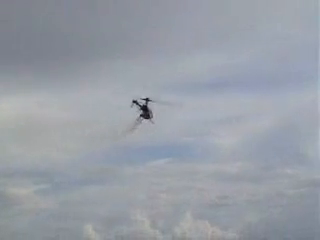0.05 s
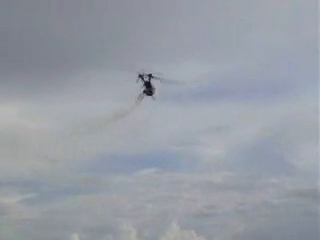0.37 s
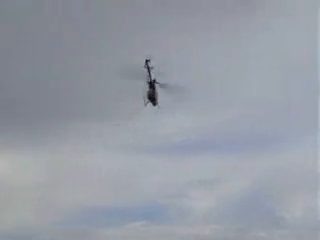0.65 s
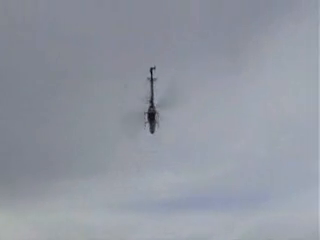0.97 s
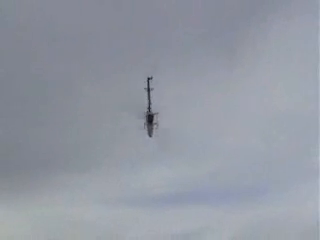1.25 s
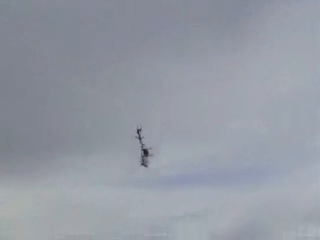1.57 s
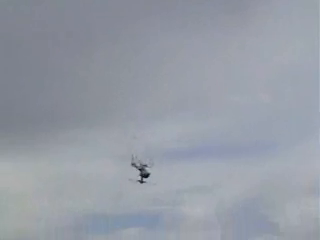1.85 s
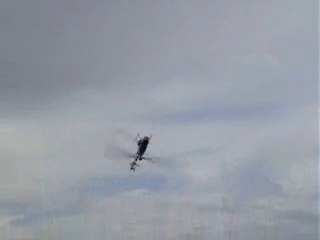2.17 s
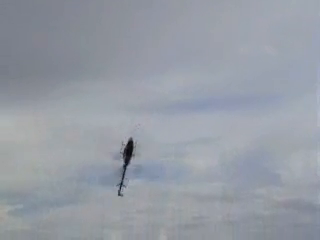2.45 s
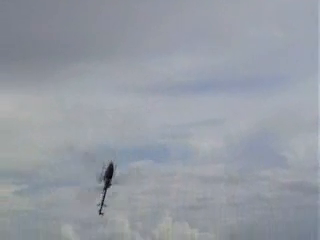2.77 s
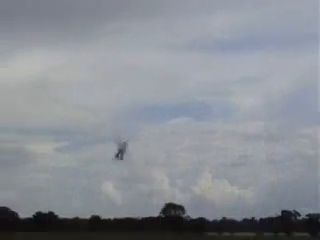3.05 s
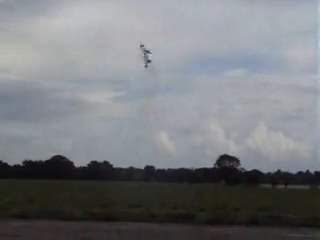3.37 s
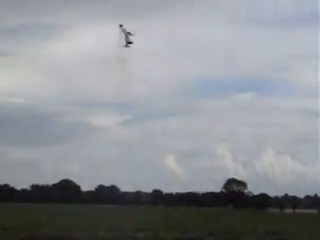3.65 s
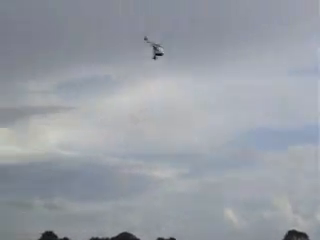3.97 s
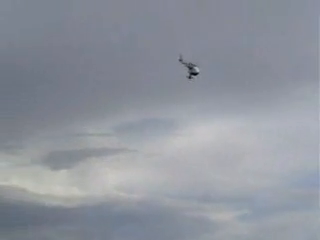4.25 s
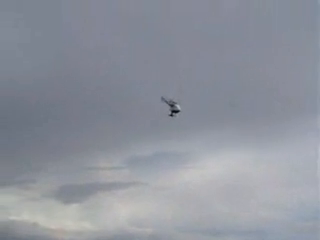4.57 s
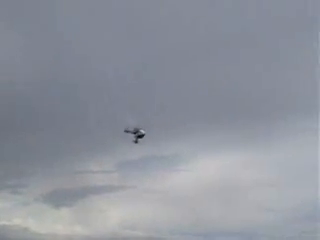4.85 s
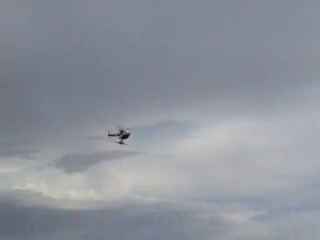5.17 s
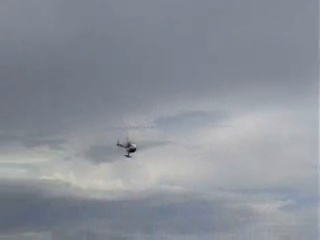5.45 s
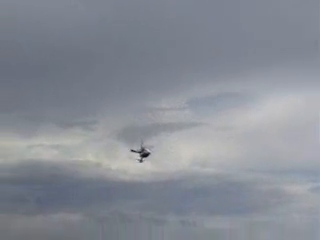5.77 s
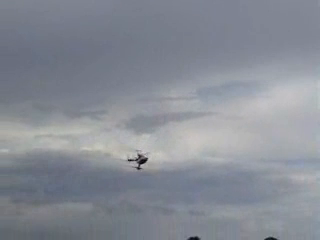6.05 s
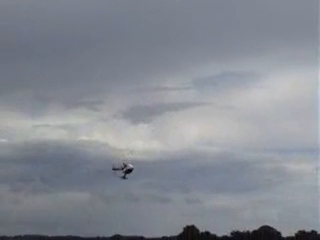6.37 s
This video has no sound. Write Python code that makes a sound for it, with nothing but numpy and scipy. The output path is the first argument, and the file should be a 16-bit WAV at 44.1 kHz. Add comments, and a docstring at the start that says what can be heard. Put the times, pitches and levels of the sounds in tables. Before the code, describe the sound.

The high, raspy buzz of a fuel-powered model helicopter sags and recovers through flips, rotors swishing, before wind buffets the microphone.

```python
"""Model helicopter over a field

A nitro model helicopter flips and swoops. Its two-stroke engine, geared to both rotors, sags under
load and skips every other firing when running light. Gears whine and the blades chop the air.
An echo off the ground sweeps through it all, and gusts on the microphone make the volume duck."""
import sys
import numpy as np
from scipy import signal
from scipy.fft import rfft, irfft, next_fast_len
from scipy.io import wavfile
from scipy.ndimage import uniform_filter1d

SR = 44100
rng = np.random.default_rng(int(sys.argv[2]) if len(sys.argv) > 2 else 0)


def unload_audio(sound):
    """Save the sound as a 16-bit wav file, at the path given as the first command line argument."""
    columns = np.transpose(np.atleast_2d(sound))
    # keep every value between -1 and 1, then stretch to whole-number steps
    steps = np.round(np.clip(columns, -1, 1) * 32767)
    wavfile.write(sys.argv[1], SR, steps.astype(np.int16))


N = 283122
TIME = np.arange(N) / SR
GEAR_RATIO = 8.5  # engine turns for one turn of the main rotor

# how fast the engine spins: (time [s], speed [turns per s])
ENGINE_SPEED = [(0, 279.4), (.6, 277.8), (1.05, 270.9), (1.49, 263), (1.87, 262.9), (2.09, 260.5),
                (2.54, 253.4), (2.84, 251.2), (3.02, 255.7), (3.43, 245.7), (3.6, 248.6), (3.88, 259.2),
                (4.18, 267.6), (4.48, 274.4), (4.9, 280), (5.33, 281), (5.9, 289.2), (6.42, 294.1)]
def shaft_angles():
    """How far the engine's crank and the main rotor have turned, in radians."""
    speed, = in_time(ENGINE_SPEED)
    crank = 2 * np.pi * np.cumsum(speed) / SR
    return crank, crank / GEAR_RATIO


# how loud the engine is and how hard it works: (time [s], exhaust level [dB], load [0-1])
ENGINE_EFFORT = [(0, -23, 0.15), (.8, -21.5, 0.2), (1, -21.5, .3), (1.25, -32.5, 0.75), (1.5, -35, 1),
                 (1.72, -28, .6), (1.9, -32, 0.3), (2.15, -26, 0.75), (2.4, -31.5, .9), (2.72, -29, 0.6),
                 (2.88, -23, 0.5), (3.36, -34.5, 1), (3.75, -28.5, 1), (4.17, -29.5, 0.29),
                 (4.75, -29.5, 0.33), (5.52, -30, .27), (5.74, -25, 0.1), (6, -29.5, 0.13)]
# the muffler's tones: (pitch [x engine speed], level running light [dB], level under load [dB])
EXHAUST_TONES = [(1, -12.5, -19), (2, -15, -10), (3, -15, -8), (4, -14, 0.5), (5, 1, -22), (6, -0.5, -1),
                 (7, -9.5, 0), (8, -15.5, -4), (9, -15, -15)]
# the pulses' sharp edge: (pitch [x engine speed], level running light [dB], level under load [dB])
RASP_TONES = [(9.29, -6, -7.5), (10, 1, 2.5), (11.05, -8, -9.5), (12, -0.5, -3.5), (12.8, -20, -4.5),
              (13.7, 1.5, -5), (15.95, -4.5, -1.5), (17.2, -13, -3.5), (17.3, -17, -5), (17.7, -15, -8),
              (28.22, -13.5, -14)]
def exhaust(crank, rotor, wobble=0.1, wobble_light=0.051, jitter=0.021):
    """Exhaust pulses buzz and rasp; each tone wavers once a rotor turn, which roughens it."""
    level_db, load = in_time(ENGINE_EFFORT)
    treble_db, = in_time(TREBLE_SWING)
    load = np.clip(load, 0, 1)
    angle = crank + (wobble + wobble_light * (1 - load)) * np.sin(rotor) + jitter * drift(40)
    # the lowest tones spread all round, so they swell less as the muffler turns
    low_db = 0.74 * (level_db.mean() - level_db)
    tones = firing_tones(angle, EXHAUST_TONES, load, flutter_db=1.16, low_db=low_db)
    buzz = np.sqrt(2) * from_db(level_db) * tones
    rasp_db = hiss_level() - 4.5 * (1 - load) + 0.15 * treble_db  # sharper under load
    rasp = from_db(rasp_db) * rms_one(firing_tones(angle, RASP_TONES, load, flutter_db=4.0))
    return (buzz + rasp) * (1 + 0.024 * np.cos(2 * rotor))


def firing_tones(angle, table, load, flutter_db, low_db=0):
    """Firings make tones at whole multiples of engine speed; skipped ones add tones halfway between."""
    multiples, light, loaded = np.transpose(table)
    skip_db = skipped_firings()
    out = np.zeros(N)
    for half in range(round(2 * multiples[0]), round(2 * multiples[-1])):
        k, halfway = half / 2, half % 2
        if halfway and k > 15:
            continue
        db = np.interp(k, multiples, light) * (1 - load) + np.interp(k, multiples, loaded) * load
        db = db + low_db * (k < 4) + skip_db * halfway
        out += from_db(db + flutter_db * drift(3.6)) * np.cos(k * angle + rng.uniform(0, 2 * np.pi))
    return out


# spells of skipping every other firing: (start [s], end [s], halfway tones against whole ones [dB])
SKIP_SPELLS = [(0, 0.497, -3), (1.897, 1.984, -1.5), (2.577, 2.665, 2.5), (4.126, 5.353, -4.5),
               (5.537, 6.05, -14.5)]
def skipped_firings(fade_db_per_s=76, steady_firing_db=-22.5):
    """Strength of the halfway tones in dB: each spell of skipping fades in and out."""
    spells = [db - fade_db_per_s * np.abs(TIME - np.clip(TIME, start, end))
              for start, end, db in SKIP_SPELLS]
    return np.maximum(np.max(spells, axis=0), steady_firing_db)


# the high sounds swing up and down as the helicopter turns: (time [s], level [dB])
TREBLE_SWING = [(0, -0.5), (1.25, 0.5), (1.42, 4), (1.85, -4), (2.03, 2.5), (2.25, -4.5), (2.5, -2),
                (2.73, 0.5), (2.88, -7.5), (3.03, -2.5), (3.18, 4), (3.33, -8), (3.5, -5.5), (3.72, 0),
                (4.38, 1), (4.6, -2.5), (4.9, -0.5), (6.42, -8.5)]
def hiss_level():
    """Base level of rasp and hiss in dB: both rise with the treble and with the exhaust."""
    exhaust_db = in_time(ENGINE_EFFORT)[0]
    return -27.5 + 0.5 * in_time(TREBLE_SWING)[0] + 0.34 * (exhaust_db - exhaust_db.mean())


# tone colour of the exhaust's hiss: (frequency [Hz], level [dB])
HISS_COLOUR = [(700, -17), (1300, 2.5), (1800, 5), (2250, -9), (2700, 4), (3300, -2), (4000, 3.5),
               (4700, -2.5), (5600, 3.5), (6600, -9), (8000, -26)]
# tone colour of its highest sizzle: (frequency [Hz], level [dB])
SIZZLE_COLOUR = [(4000, -33), (5600, 7.5), (6300, 7), (7200, 5), (7900, -8)]
def exhaust_hiss(crank, rotor, hiss_db=-1.0, sizzle_db=-32):
    """The jet of exhaust gas hisses in puffs, one per engine turn, and pulses faintly with the rotor."""
    hiss = from_db(hiss_level() + hiss_db) * noise(HISS_COLOUR)
    sizzle = from_db(in_time(TREBLE_SWING)[0] + sizzle_db) * noise(SIZZLE_COLOUR)
    pulsing = puffs(crank, depth=0.3) * puffs(rotor, depth=0.053) * puffs(2 * rotor, depth=0.017)
    return (hiss + sizzle) * pulsing


# the main rotor bites hardest in the two flips: (time [s], thrum level [dB], swish level [dB])
ROTOR_BITE = [(0, -46, -34.5), (.75, -40.5, -33.5), (1.1, -31.5, -28), (1.38, -30, -25.5), (1.7, -34, -26),
              (2.2, -39, -27.5), (2.6, -35.5, -22), (2.84, -31, -21.5), (3.4, -41, -32.5),
              (4.2, -43.5, -33), (5.05, -41, -36), (5.7, -38.5, -33)]
# tone colour of the blades' low thrum: (frequency [Hz], level [dB])
THRUM_COLOUR = [(30, -25), (62, -7), (125, -8.5), (190, -8), (260, -3.5), (390, 0), (480, -6.5), (560, -24),
                (900, -20.5)]
# a deep drone swells as the rotor disc faces the listener: (time [s], level [dB])
DRONE_LEVEL = [(0, -53.5), (.6, -52.5), (1.11, -37), (1.5, -53.5), (6.42, -59.5)]
def blade_thrum(rotor, thrum_db=1.0, odd_db=-4, flutter_db=4.5, stray=0.21):
    """Two main blades beat the air; being slightly unequal, they add odd multiples of the rotor speed."""
    turn_hz = np.mean(np.array(ENGINE_SPEED)[:, 1]) / GEAR_RATIO
    thrum = np.zeros(N)
    for k in range(3, 21):
        db = at_hz(THRUM_COLOUR, k * turn_hz) + odd_db * (k % 2) + flutter_db * drift(8.5)
        thrum += from_db(db) * np.sin(k * rotor + stray * drift(16) + rng.uniform(0, 2 * np.pi))
    drone = from_db(in_time(DRONE_LEVEL)[0]) * rms_one(np.sin(2 * rotor))
    return from_db(in_time(ROTOR_BITE)[0] + thrum_db) * rms_one(thrum) + drone


# tone colour of air torn by the blades: (frequency [Hz], level [dB])
SWISH_COLOUR = [(100, -43), (300, -6.5), (550, -7), (850, 0.5), (1300, -0.5), (1800, -4), (2400, -6.5),
                (4000, -15.5)]
def blade_swish(rotor, swish_db=0.5, chop=0.15, chop_hard=0.55):
    """The blades tear the air; the harder they work, the more the swish gathers into separate chops."""
    level_db = in_time(ROTOR_BITE)[1]
    depth = chop + chop_hard * from_db(level_db - level_db.max())
    chops = np.exp(depth * np.cos(2 * rotor)) / np.sqrt(np.i0(2 * depth))  # same power at any depth
    return from_db(level_db + swish_db) * noise(SWISH_COLOUR) * chops


# a blade hits the swirling air left by the other: (time [s], level [dB])
WAKE_STRIKES = [(2.807, -10.5), (2.871, -20), (2.889, -12), (2.905, -7), (2.922, -14.5), (2.939, -9),
                (2.955, -24), (3.005, -14), (3.021, -11), (3.037, -15), (3.073, -18), (3.107, -18.5)]
def blade_slaps(ring_hz=950, width_hz=300):
    """Each strike is a short knock of air that swells fast and dies away."""
    out = np.zeros(N)
    for start, db in WAKE_STRIKES:
        age = np.maximum(TIME - start, 0)
        rise = np.pi * width_hz * age
        envelope = rise * np.exp(1 - np.minimum(rise, 50))
        out += from_db(db) * envelope * np.sin(2 * np.pi * ring_hz * age)
    return out


def tail_rotor(crank, beats_per_turn=1.2, tail_db=-13, stray=0.21):
    """The tail rotor sings four tones, louder when the main blades work hard."""
    tones = sum(from_db(db) * np.cos(k * beats_per_turn * crank + stray * drift(15))
                for k, db in enumerate([-20.5, -19, -15, 2.0], start=1))
    return from_db(in_time(ROTOR_BITE)[1] + tail_db) * rms_one(tones)


# how the main gear's whine rises and falls: (time [s], level [dB])
WHINE_LEVEL = [(0, -27.5), (.6, -25), (1.33, -22), (1.48, -20.5), (1.72, -23), (1.87, -26.5), (2.35, -29),
               (2.62, -26.5), (3.03, -28.5), (3.27, -15.5), (3.35, -33.5), (3.57, -34), (3.7, -24),
               (3.88, -31), (4.2, -21.5), (4.55, -31.5), (5.7, -29.5), (6.42, -35.5)]
def main_gear(crank, rotor, teeth=20, whine_db=-4.5, flutter_db=3.0):
    """A small gear drives a slightly off-centre big one; unloaded teeth rattle and blur the whine."""
    slack = 1 - np.clip(in_time(ENGINE_EFFORT)[1], 0, 1)
    off_centre = (1.2 + 2.6 * slack) * np.sin(rotor)
    rattle = 0.88 * drift(100) + slack * drift(200)
    tone = np.cos(teeth * crank + off_centre + rattle)
    whine = rms_one(tone * from_db(flutter_db * drift(57)) * puffs(rotor, depth=0.099))
    return from_db(in_time(WHINE_LEVEL)[0] + whine_db) * whine


def tail_gear(crank, rotor, bites_per_turn=16, off_centre=0.51, scatter=0.6):
    """The teeth of the smaller tail drive sing below the main whine, loudest under load."""
    load = in_time(ENGINE_EFFORT)[1]
    level_db = -47.5 + 9 * load + 2 * in_time(TREBLE_SWING)[0]
    angle = bites_per_turn * crank + off_centre * np.sin(rotor) + scatter * drift(72)
    return from_db(level_db) * rms_one(np.cos(angle))


# how late the echo comes, longest with the helicopter overhead: (time [s], delay [ms])
ECHO_DELAY = [(0, 1.6), (.47, 1.606), (1.15, 2.44), (1.42, 2.52), (2.2, 1.76), (3.15, 1.14), (3.44, 1.026),
              (4, 1.63), (4.45, 2.06), (4.97, 2.02), (5.65, 1.436), (6.42, 1.06)]
# the echo weakens while the helicopter rolls over: (time [s], level [dB])
ECHO_LEVEL = [(0, -0.5), (1, -0.5), (1.8, -3.5), (2.1, -3), (2.5, -9), (2.9, -10), (3.4, -1), (6.42, -1.5)]
# what the ground gives back, with the treble scattered away: (frequency [Hz], level [dB])
ECHO_COLOUR = [(100, -1), (900, -5.5), (1500, -2), (2200, -1.5), (3000, -5), (4500, -9.5), (7500, -9.5)]
def with_ground_echo(direct):
    """The sound plus its bounce off the ground; the changing delay sweeps which pitches cancel."""
    delay_ms, = in_time(ECHO_DELAY)
    echo_db, = in_time(ECHO_LEVEL)
    echo = np.interp(TIME - delay_ms / 1000, TIME, coloured(direct, ECHO_COLOUR))
    return direct + from_db(echo_db) * echo


# bands added on the right and taken from the left: (frequency [Hz], width [Hz], level [dB])
RIGHT_LEANING_BANDS = [(1430, 210, -15.5), (2350, 190, -11.5), (5300, 500, -21)]
def stereo_spread(sound):
    """Three narrow bands sit slightly to the right, giving a little stereo width."""
    side = sum(from_db(db) * signal.lfilter(*signal.iirpeak(hz, hz / width, fs=SR), sound)
               for hz, width, db in RIGHT_LEANING_BANDS)
    return np.array([sound - side, sound + side])


# tone colour of soft wind: (frequency [Hz], level [dB])
RUMBLE_COLOUR = [(15, -0.5), (40, -0.5), (80, 2.5), (160, 4), (300, -9.5), (700, -20), (2000, -37.5)]
# tone colour of hard wind: (frequency [Hz], level [dB])
BUFFET_COLOUR = [(40, -32), (110, -7), (220, 2), (350, -1), (700, -3.5), (1200, -12), (3000, -29)]
# gusts on the microphone: (time [s], half-length [s], level [dB], hardness [0-1])
WIND_GUSTS = [(1.268, 0.054, -30, 0.2), (1.552, 0.073, -27, 0.27), (1.72, .04, -35, 0.1),
              (2.31, 0.043, -34.5, 0), (3.276, .045, -33, 0), (4.37, 0.014, -36.5, 0),
              (4.564, 0.015, -33, 0), (4.928, 0.005, -19.5, 0.81), (5, .011, -12.5, 0.78),
              (5.213, 0.14, -32.5, 0.8), (5.438, 0.028, -26.5, 0.93), (5.503, 0.0091, -19.5, 0.87),
              (5.707, 0.051, -28.5, 0.8), (5.815, 0.019, -21.5, 0.9), (5.874, 0.017, -19, 1),
              (6.08, 0.017, -19.5, 0.9), (6.191, 0.03, -24.5, 0.98), (6.246, 0.023, -20, 0.95),
              (6.32, 0.03, -22, 1)]
def wind(breeze_db=-44.5, wander_db=2.5, swell_s=0.031, swell_db=16):
    """A breeze and soft gusts rumble; hard gusts batter the microphone and end in a swell of pressure."""
    rumble = from_db(breeze_db + wander_db * drift(2.6))
    buffet, swell = 0, 0
    for peak_s, half_s, db, hardness in WIND_GUSTS:
        hardness = np.clip(hardness, 0, 1)
        gust = from_db(db) * np.exp(-0.5 * ((TIME - peak_s) / half_s) ** 2)
        rumble += (1 - hardness) * gust
        buffet += hardness * gust
        swell_at = peak_s + half_s + swell_s / 2
        swell += hardness * from_db(db + swell_db) * np.exp(-0.5 * ((TIME - swell_at) / swell_s) ** 2)
    soft = rumble * swirling_air(RUMBLE_COLOUR, shared=0.074) * from_db([[0.7], [-0.7]])  # leans left
    hard = buffet * swirling_air(BUFFET_COLOUR, shared=0.16)
    return soft + hard + swell


def swirling_air(colour, shared, lumps_db=2.6):
    """Lumpy wind noise, partly shared by left and right."""
    common = np.sqrt(shared) * noise(colour)
    separate = np.sqrt(1 - shared) * np.array([noise(colour), noise(colour)])
    return rms_one((common + separate) * from_db(lumps_db * drift(28)))


def from_db(db):
    """Turn decibels into a multiplier."""
    return 10 ** (np.asarray(db) / 20)


def rms_one(x):
    """Scale a sound to an average power of 1."""
    return x / np.sqrt(np.mean(x ** 2) + 1e-20)


def in_time(rows):
    """Join a table's points into one curve per column after the time."""
    times, *columns = np.transpose(rows)
    return [np.interp(TIME, times, column) for column in columns]


def at_hz(colour, hz):
    """Read a tone colour's level in dB at any frequency."""
    hzs, dbs = np.transpose(colour)
    return np.interp(np.log(hz + 1e-3), np.log(hzs), dbs)


def drift(rate_hz):
    """A smooth random wander, about 1 in size."""
    step = 40  # samples per random value
    pole = np.exp(-2 * np.pi * step * rate_hz / SR)
    slow = signal.lfilter([1], [1, -2 * pole, pole * pole], rng.standard_normal(N // step + 2002))[2000:]
    return np.interp(np.arange(N) / step, np.arange(len(slow)), rms_one(slow))


def puffs(angle, depth):
    """One smooth swell per turn."""
    return rms_one(np.exp(depth * np.cos(angle)))


def coloured(x, colour):
    """Give a sound a tone colour, fading beyond the table's ends."""
    size = next_fast_len(N)
    hz = np.arange(size // 2 + 1) * SR / size
    ends = np.minimum(hz / colour[0][0], 1) ** 2 / np.maximum(hz / colour[-1][0], 1) ** 2
    return irfft(rfft(x, size) * from_db(at_hz(colour, hz)) * ends, size)[:N]


def noise(colour):
    """Noise with a given tone colour and a power of 1."""
    return rms_one(coloured(rng.standard_normal(N), colour))


def scene():
    """One shaft drives the whole helicopter; its sound and echo meet the wind at the microphone."""
    crank, rotor = shaft_angles()
    hiss = exhaust_hiss(crank, rotor)
    gears = main_gear(crank, rotor) + tail_gear(crank, rotor)
    engine = exhaust(crank, rotor)
    blades = blade_thrum(rotor) + blade_swish(rotor) + blade_slaps() + tail_rotor(crank)
    return stereo_spread(with_ground_echo(engine + hiss + blades + gears)) + wind()


def record(dry, threshold_db=-6, recovery_db_per_s=45, low_cut_hz=30, high_cut_hz=7950):
    """Automatic volume ducks on wind pressure and recovers; then the deepest bass and the top are cut."""
    level_db = 20 * np.log10(uniform_filter1d(np.abs(dry).mean(axis=0), size=256) + 1e-6)
    excess_db = np.maximum(level_db - threshold_db, 0)
    recovery = recovery_db_per_s * TIME
    duck_db = np.maximum.accumulate(excess_db + recovery) - recovery  # drops at once, comes back slowly
    ducked = dry * from_db(-uniform_filter1d(duck_db, size=512))
    out = signal.sosfilt(signal.butter(6, low_cut_hz, "high", fs=SR, output="sos"), ducked)
    return signal.sosfilt(signal.ellip(12, 0.2, 80, high_cut_hz, fs=SR, output="sos"), out)


dry = scene()
out = record(dry)
unload_audio(out)
```